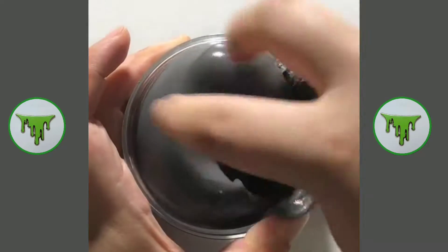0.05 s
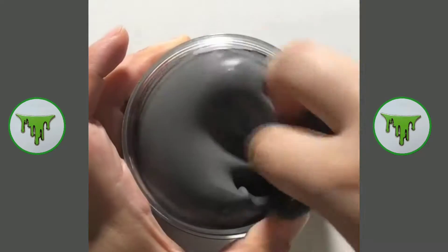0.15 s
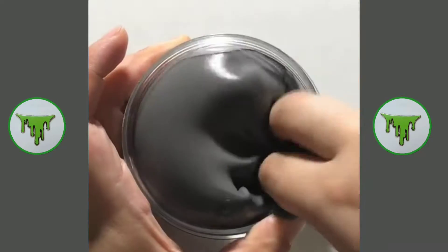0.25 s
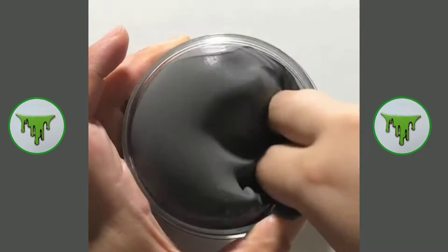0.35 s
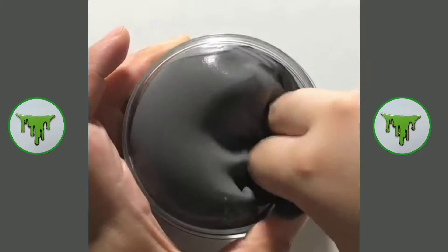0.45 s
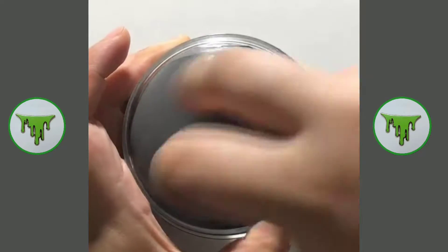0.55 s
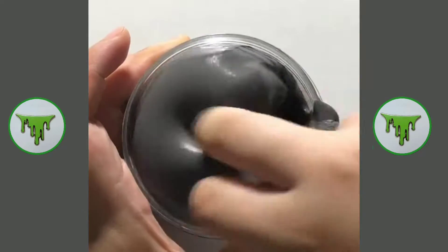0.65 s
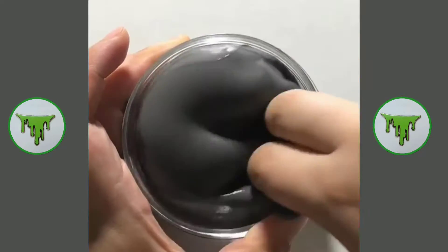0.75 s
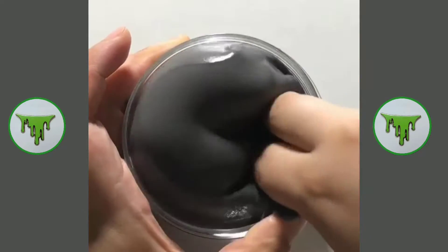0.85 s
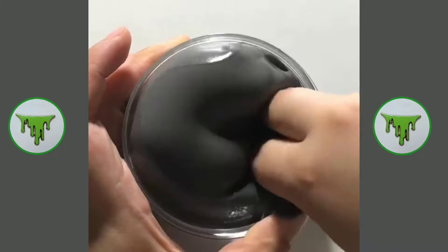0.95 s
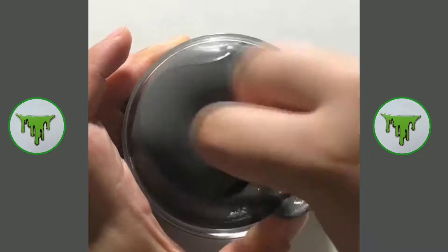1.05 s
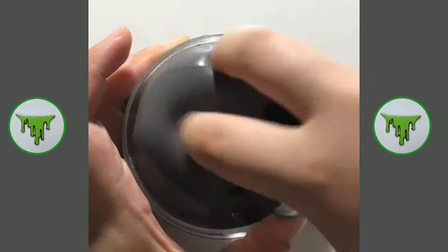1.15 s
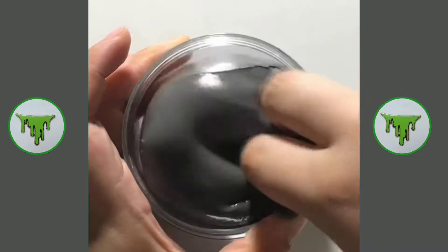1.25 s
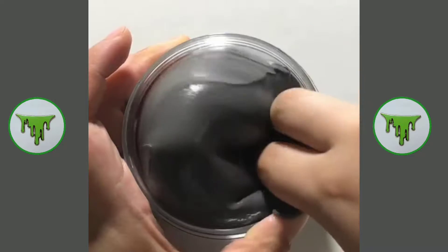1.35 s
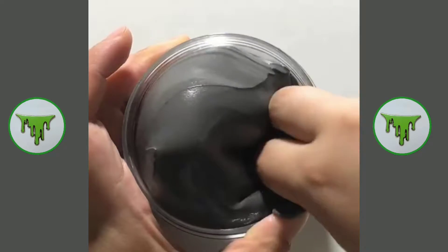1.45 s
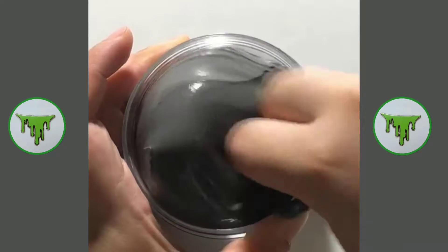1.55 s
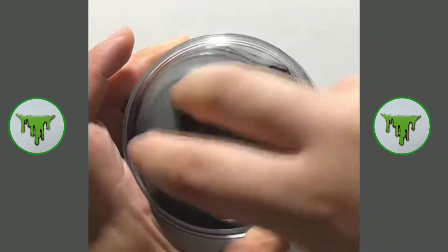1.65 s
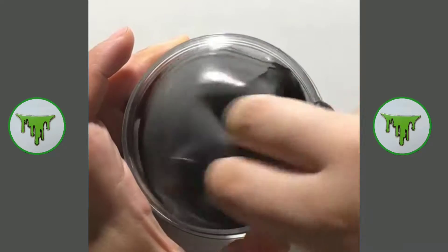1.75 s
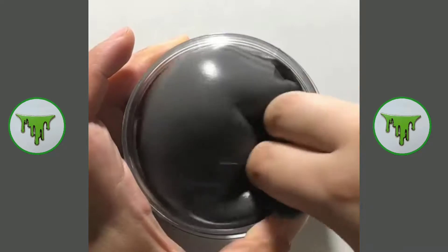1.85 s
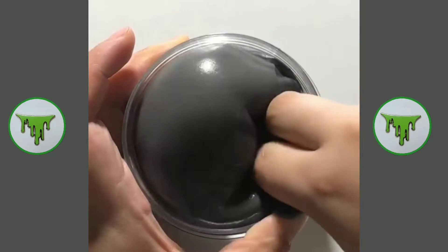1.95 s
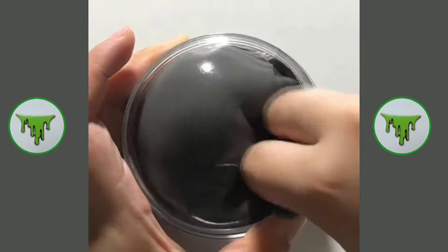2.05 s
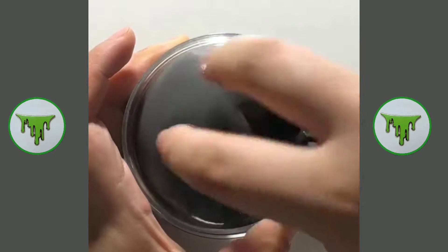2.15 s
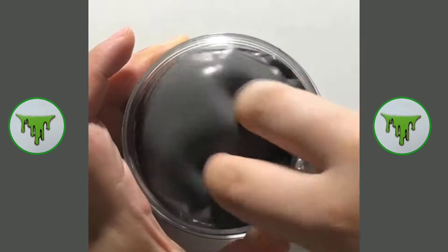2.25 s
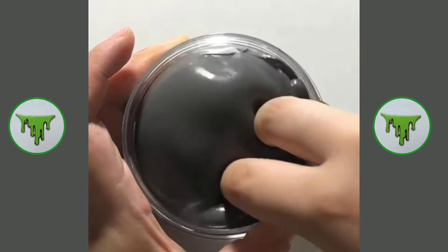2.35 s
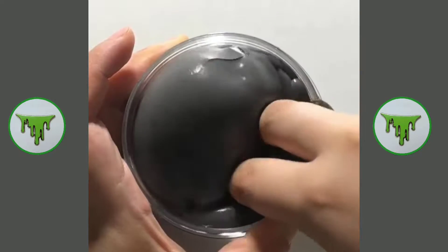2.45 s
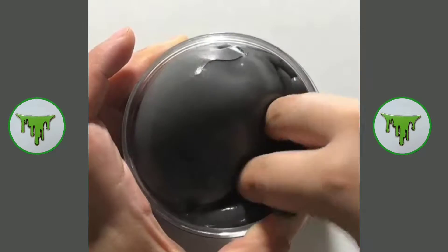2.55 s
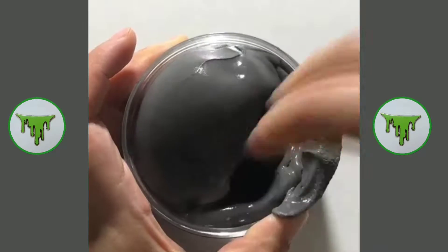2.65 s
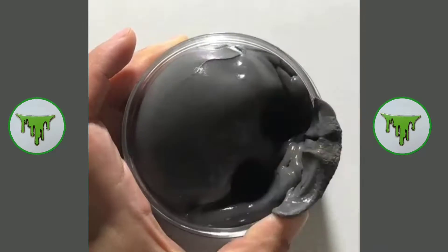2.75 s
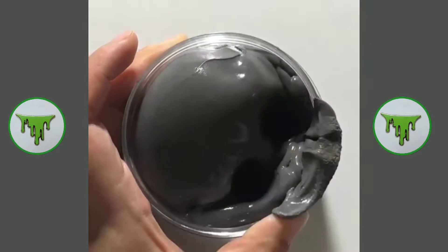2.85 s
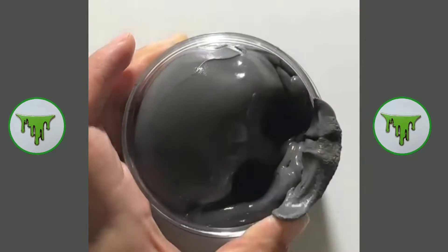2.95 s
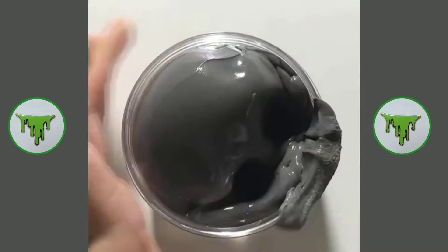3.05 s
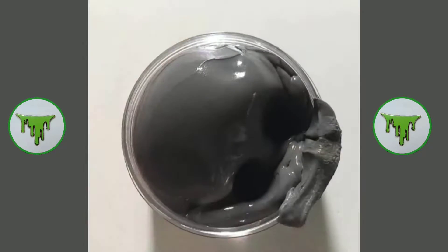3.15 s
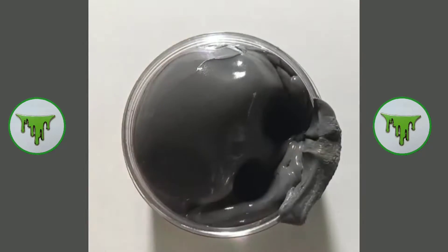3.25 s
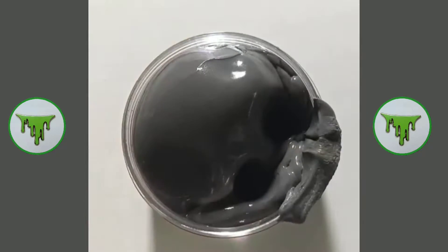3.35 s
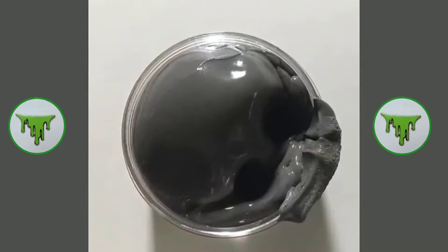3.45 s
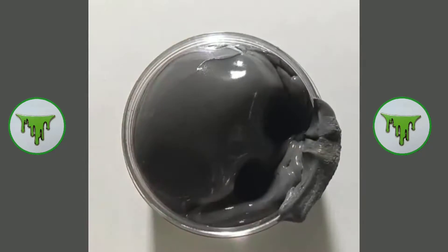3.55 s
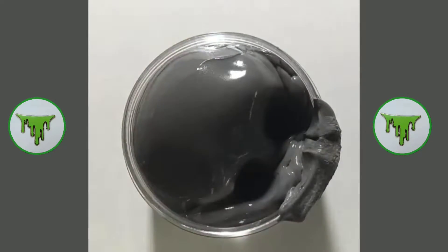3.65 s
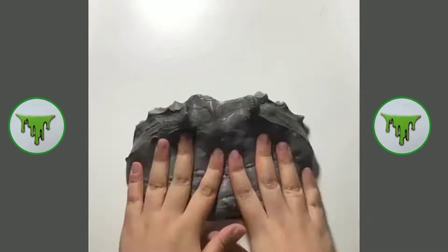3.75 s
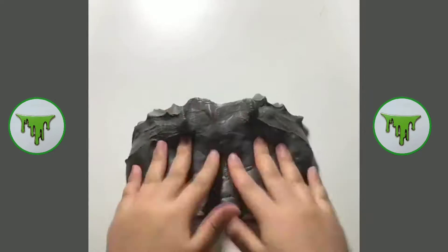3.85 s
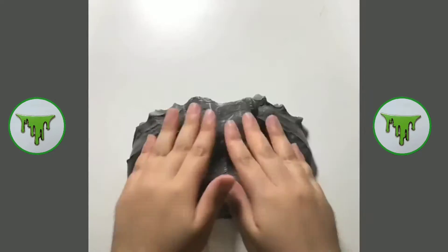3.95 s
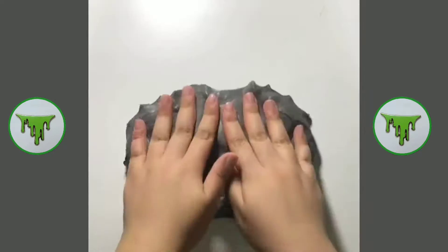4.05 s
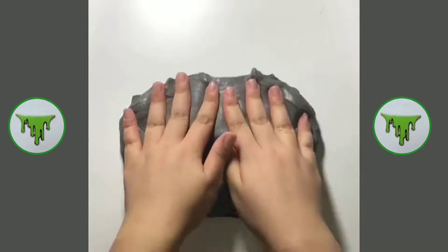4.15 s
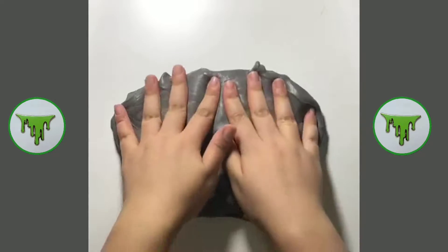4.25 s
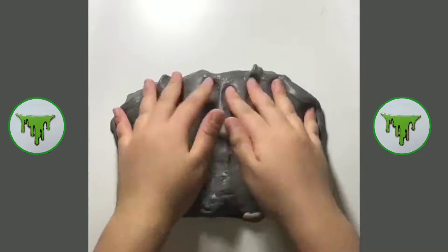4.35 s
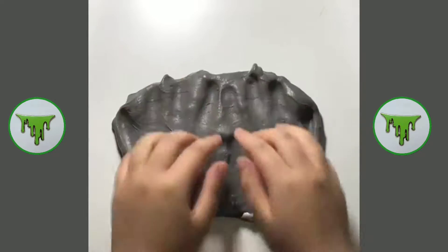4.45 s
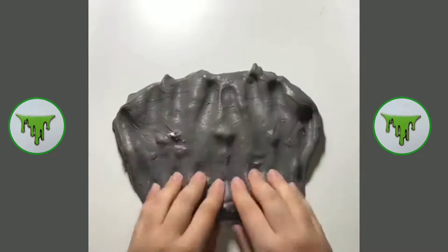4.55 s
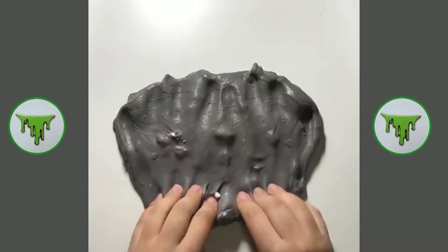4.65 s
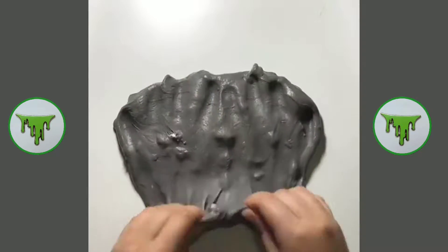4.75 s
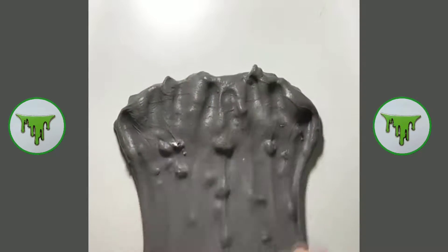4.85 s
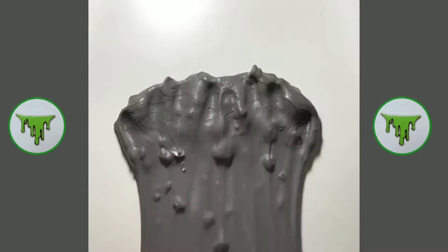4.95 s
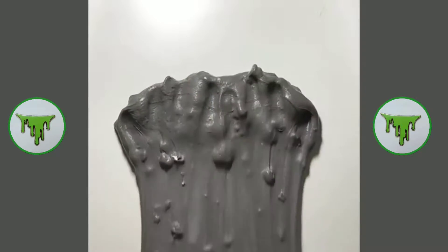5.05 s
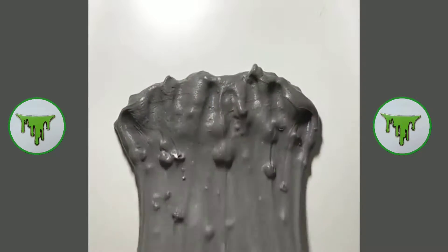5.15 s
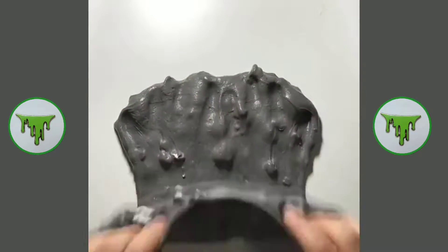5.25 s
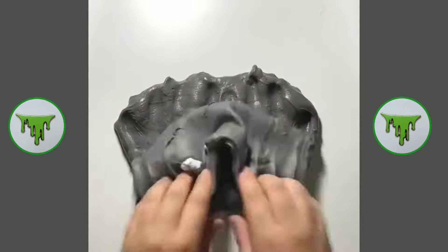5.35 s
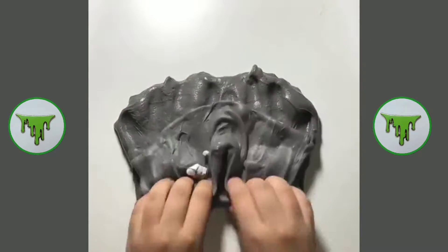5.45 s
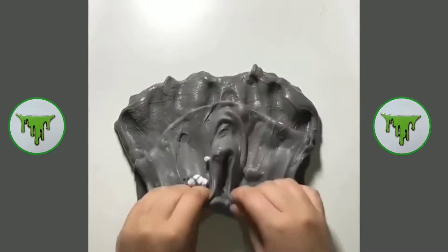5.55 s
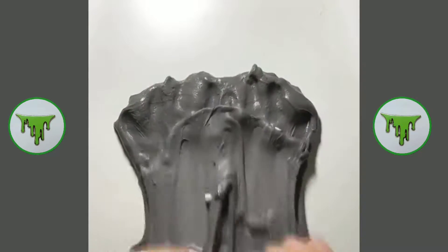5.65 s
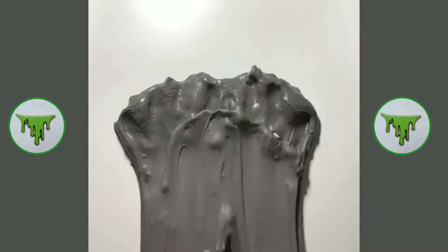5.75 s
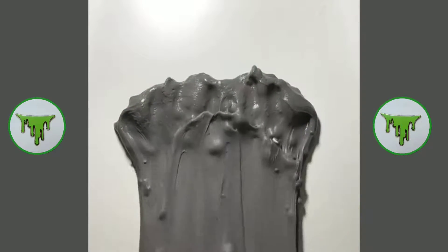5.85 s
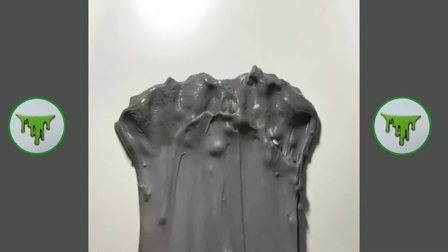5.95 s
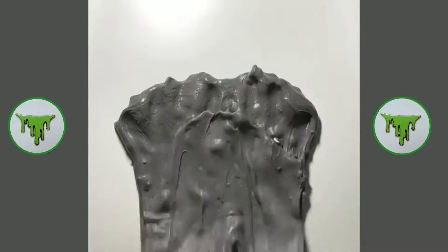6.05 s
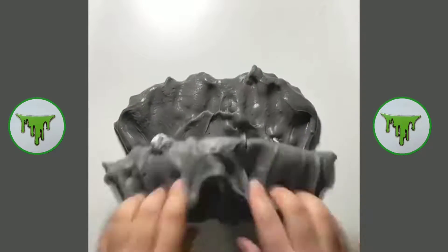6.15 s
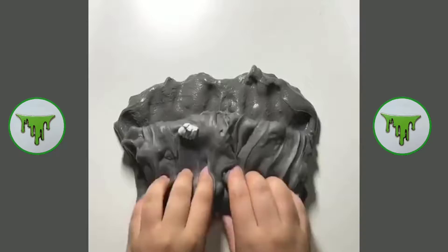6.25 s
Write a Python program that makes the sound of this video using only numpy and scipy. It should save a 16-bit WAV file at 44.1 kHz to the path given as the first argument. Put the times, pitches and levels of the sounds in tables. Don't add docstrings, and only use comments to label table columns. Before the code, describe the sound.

Very close, fingers push into a cup of thick slime: bursts of bright, ringing air pops, sticky crackle and tiny whistles over a soft low wobble. After a quiet gap the slime is spread and pulled on a table, with quieter, lower squelches and wet tearing. Quiet room with faint low hum and a short wall reflection.

```python
import sys
import numpy as np
from scipy import signal
from scipy.fft import rfft, irfft
from scipy.io import wavfile
from scipy.ndimage import uniform_filter1d

SR = 44100
rng = np.random.default_rng(int(sys.argv[2]) if len(sys.argv) > 2 else 0)


def master_out(mix):
    frames = np.transpose(np.atleast_2d(mix))
    ceiling = np.clip(frames, -1, 1)
    pcm = np.round(ceiling * 32767).astype(np.int16)
    wavfile.write(sys.argv[1], SR, pcm)


def invert_db(level):
    return 10 ** (np.asarray(level, dtype=float) / 20)


N = 277830
TABLE_START_S = 3.896


def level(x, db):
    return x * invert_db(db) / np.sqrt(np.mean(x ** 2))


def band(x, lo_hz, hi_hz, order=2):
    edges_hz = [lo_hz, min(hi_hz, .45 * SR)]
    return signal.sosfilt(signal.butter(order, edges_hz, "band", fs=SR, output="sos"), x)


def steep_lowpass(x, edge_hz, stop_db):
    return signal.sosfiltfilt(signal.ellip(6, .3, stop_db, edge_hz, fs=SR, output="sos"), x)


def ring(hz, t60_s, size, rise_s=.0001, glide=0.):
    t = np.arange(size) / SR
    envelope = (1 - np.exp(-t / rise_s)) * np.exp(-np.log(1000) * t / t60_s)
    mode = envelope * np.sin(2 * np.pi * hz * t * (1 + glide * t / t60_s))
    return mode / np.abs(mode).max()


def add(out, start_s, x):
    i = int(start_s * SR)
    out[i:i + len(x)] += x[:len(out) - i]


def walk(rate_hz):
    hold = int(SR / rate_hz)
    held = np.repeat(rng.standard_normal(N // hold + 1), hold)[:N]
    return uniform_filter1d(uniform_filter1d(held, hold), hold) * np.sqrt(2)


def pockets():
    # time in seconds, pocket peak in dB, pocket pitch in Hz,
    # finger hole over pocket in dB, top partial over pocket in dB.
    large = [(0.0967, -22, 2780, -32, -1), (0.4634, -15.5, 4650, 3.5, -9), (0.4705, -33, 4700, -27, -8),
             (0.6256, -32, 5400, 7.5, 12), (0.6497, -12, 4210, -4.5, -5), (0.974, -36, 5500, -42, -2),
             (1.1642, -34, 3900, -8, -1), (1.1678, -32, 3700, -18.5, 1), (1.1722, -17.5, 3820, 1.5, 2.5),
             (1.6911, -27.5, 4200, 0.5, -11), (1.6932, -15, 5500, -34, -10), (1.715, -33, 4220, 1, -1),
             (2.2167, -35, 5000, -27, -3), (2.2219, -17.5, 4500, -31, 0), (2.4497, -26, 4380, -9.5, -6),
             (2.7612, -18.5, 5100, -25, 7), (2.7641, -13, 4840, -12.5, 3), (2.765, -24, 4430, -15, 10.5),
             (2.7795, -31.5, 4000, -6.5, -8), (2.7807, -31, 3860, -2.5, 0), (4.236, -45, 6800, -8, 2),
             (4.892, -33, 3510, 5, -16), (5.5438, -23.5, 3530, 1, -7.5), (5.8205, -36, 3660, 14, -2),
             (0.4581, -32, 4600, -1.5, -13)]
    # time in seconds, peak in dB, pitch in Hz.
    small = [(0.6503, -26.5, 10900), (1.1634, -33, 11000), (1.1725, -29.5, 10800), (1.179, -31, 7700),
             (2.222, -21.5, 10500), (2.2168, -34, 7300), (2.5103, -28, 8300), (0.1075, -36, 8000),
             (0.63, -31, 4500), (0.6612, -37, 10800), (0.1107, -29, 3510), (0.2826, -43, 4310),
             (0.65, -20, 5820), (0.6618, -35, 3430), (0.9017, -49, 4440), (0.93, -41, 4630),
             (0.963, -38, 5850), (0.9804, -30.5, 5400), (1.015, -38.5, 3700), (1.1785, -23.5, 4200),
             (1.494, -40, 4720), (1.522, -47, 3600), (1.6934, -15.5, 7760), (1.71, -27.5, 5200),
             (1.713, -31, 5130), (2.418, -44.5, 4860), (2.5723, -31, 4800), (4.226, -43, 3480),
             (4.26, -49, 4390), (4.3172, -46, 4660), (4.685, -50.5, 3460), (4.8445, -36, 4740),
             (5.092, -40, 2800), (5.208, -36, 3600), (5.7802, -31.5, 2820), (5.91, -38.5, 3470),
             (5.92, -37.5, 3800), (5.964, -43.5, 3970)]
    # time in seconds, peak in dB, pitch in Hz.
    hollows = [(0.099, -15.5, 2460), (0.1184, -35, 1360), (0.122, -29, 2390), (0.641, -27, 2400),
               (5.753, -29, 1100), (5.719, -30, 2200), (4.969, -30, 1300), (5.023, -33.5, 1210),
               (0.629, -20.5, 2350), (0.6314, -25, 1760), (1.964, -36.5, 1720), (2.0345, -38.5, 1750),
               (2.192, -35.5, 1700), (2.3737, -39.5, 1850), (2.4024, -29, 1930), (2.574, -26.5, 2330),
               (3.1938, -35.5, 1570), (4.183, -31, 998), (4.3166, -29.5, 1030), (4.899, -22, 1370),
               (4.9328, -30, 2450), (4.9525, -24, 1200), (4.9555, -27, 1010), (5.1752, -34.5, 2670),
               (5.388, -31.5, 1750), (5.535, -20, 1110), (5.743, -25, 1410), (5.6124, -30, 1310),
               (5.626, -26.5, 1250), (5.675, -28.5, 1150), (5.762, -25, 1350), (5.799, -30, 1160),
               (5.857, -32, 1300), (6.2052, -28, 1250), (6.2075, -26, 880)]
    # time in seconds, peak in dB.
    films = [(0.428, -47), (0.4363, -48.5), (0.6211, -45), (1.071, -59), (2.418, -49), (2.5038, -35.5),
             (2.5068, -45.5), (2.513, -35), (2.5134, -44), (2.518, -29), (2.5213, -37), (2.6416, -44),
             (2.754, -33), (3.1943, -55), (4.4957, -38)]
    # time in seconds, peak in dB.
    cracks = [(0.09, -49), (1.4312, -54), (1.45, -58), (1.9637, -45.5), (2.035, -54), (2.1925, -50),
              (2.29, -63), (2.545, -54), (5.8188, -35.5), (2.755, -40), (2.783, -36), (4.2372, -44),
              (4.4225, -50.5), (4.685, -48), (5.0928, -44.5), (5.1756, -49), (5.208, -51), (5.39, -56),
              (6.2049, -43.5)]

    def hole_hz(s):
        return 1750 if s < TABLE_START_S else 1250

    bursts = []
    for s, db, hz, hole_db, top_db in large:
        bursts.append((s, db, hz, db + hole_db, hole_hz(s), db + top_db))
    for s, db, hz in small:
        bursts.append((s, db, hz, db - 13.5, hole_hz(s), db - 35))
    for s, db, hz in hollows:
        bursts.append((s, db - 18.5, hz * 2.3, db, hz, db - 30))
    for s, db in films:
        bursts.append((s, db - 17, 5200, db - 34, hole_hz(s), db))
    for s, db in cracks:
        bursts.append((s, db, 4500, db + 3.5, 2240, db + 3))
    return bursts


def pops():
    out, t = np.zeros(N), np.arange(400) / SR
    for s, db, hz, hole_db, hole_hz, top_db in pockets():
        pocket = invert_db(db - .7) * ring(hz, .0036, size=400, glide=-.05)
        top_hz = np.clip(hz * 1.95, 7500, 10800) * (1 + .04 * rng.standard_normal())
        top = invert_db(top_db - .7) * ring(top_hz, .0022, size=400)
        hole = ring(hole_hz, 11.0 / hole_hz, size=400, rise_s=.4 / hole_hz, glide=-.08)
        hole = invert_db(hole_db - 8.5) * hole
        spray = np.diff(rng.standard_normal(401)) * .7 * np.exp(-t / .0029)
        spray = spray * (invert_db(db - 18.5) + invert_db(top_db - 18.0))
        add(out, s, pocket + top + hole + spray)
    return out


def snaps():
    # time in seconds, peak in dB, pitch in Hz.
    strands = [(0.1195, -33, 3500), (0.277, -52, 4500), (0.309, -49, 1800), (0.31, -48, 4500),
               (0.428, -42, 8500), (0.4362, -35, 7800), (0.4633, -18.5, 1520), (0.4637, -19.5, 2650),
               (2.7613, -24, 5500), (0.893, -50, 2500), (0.902, -46, 7500), (0.909, -46, 5000),
               (0.9628, -29.5, 8500), (0.974, -33, 4500), (0.9804, -27.5, 5000), (0.995, -46, 4600),
               (1.002, -43, 4400), (1.431, -49, 4200), (1.45, -49, 5200), (1.494, -50, 9000),
               (1.507, -46, 6200), (1.522, -48, 5000), (2.4497, -40, 1490), (2.5717, -34, 3500),
               (2.7641, -6, 5400), (2.7644, -25, 1110), (4.182, -43, 2500), (4.1915, -43.5, 9000),
               (4.227, -42, 3000), (4.2371, -33.5, 8000), (4.2593, -44, 7000), (4.3162, -39, 3470),
               (5.61, -43, 3500), (5.845, -40, 3500), (5.857, -42, 2800), (5.896, -46, 4100),
               (5.97, -46, 4800), (6.012, -49, 3500), (6.025, -50, 4000), (6.204, -37.5, 3000),
               (6.2057, -40, 6200), (6.207, -36, 3200), (6.212, -43, 2500), (6.233, -43.5, 2800)]
    out = np.zeros(N)
    for s, db, hz in strands:
        add(out, s, invert_db(db) * ring(hz, 5 / hz, size=200, rise_s=.3 / hz))
    return out


def ticks():
    # time in seconds, peak in dB, pitch in Hz.
    threads = [(0.2713, -45, 4550), (0.305, -48, 3700), (0.35, -43, 4220), (1.1, -45, 5270),
               (1.485, -47, 4930), (1.5056, -49, 4800), (2.4, -51, 4450), (2, -49, 2680),
               (3.1637, -45.5, 4500), (5.328, -38, 3350), (5.7114, -34, 4100), (5.98, -42, 3950),
               (5.9555, -47, 9000), (5.955, -46, 4200), (6.5, -43, 3900), (6.104, -47, 6400),
               (6.103, -48, 8700), (2.408, -51, 4600), (2.424, -48, 4600), (2.409, -48, 8500),
               (2.464, -49, 4600), (2.489, -54, 10500), (5.014, -38, 3900), (4.939, -38, 3200),
               (5.808, -42, 6800), (5.1, -42, 5800), (5.4, -42, 3200)]
    out, t = np.zeros(N), np.arange(400) / SR
    for s, db, hz in threads:
        spray = .3 * rng.standard_normal(400) * np.exp(-t / .002)
        add(out, s, invert_db(db - 6) * (ring(hz, .009, size=400) + spray))
    return out


def whistles():
    # time in seconds, length in seconds, start pitch in Hz, end pitch in Hz, level in dB.
    slits = [(0.4635, 0.0052, 11300, 8500, -25), (0.4685, 0.0045, 4700, 4600, -36),
             (0.324, .026, 1800, 2050, -57.5), (0.38, 0.008, 7400, 8600, -46),
             (2.508, 0.016, 10600, 10300, -36), (0.0992, .006, 3700, 4600, -33),
             (0.1065, .0035, 4900, 5360, -34), (2.766, .0025, 4300, 5300, -33),
             (2.7, 0.024, 5700, 5000, -53), (2.388, 0.015, 1800, 1900, -53), (2.39, .018, 3100, 3500, -60),
             (2.578, .014, 3300, 3100, -57), (1.1805, .005, 10300, 11500, -39),
             (6.3, .014, 1300, 1450, -43)]
    out = np.zeros(N)
    for s, length_s, start_hz, end_hz, db in slits:
        n = int(length_s * SR)
        hz = end_hz + (start_hz - end_hz) * np.linspace(1, 0, n) ** 2
        if length_s > .01:
            hz = hz + 900 * (start_hz / 10000) ** 2 * rng.standard_normal(n)
        add(out, s, invert_db(db) * np.hanning(n) ** .5 * np.sin(2 * np.pi * np.cumsum(hz) / SR))
    return out


def jolts():
    # time in seconds, peak in dB, main pitch in Hz.
    shoves = [(0.097, -40, 168), (0.122, -44, 139), (0.464, -33.5, 168.4), (0.632, -41, 166.5),
              (0.653, -39.5, 168), (1.174, -33.5, 191), (1.192, -36.5, 171), (1.694, -36.5, 170.4),
              (2.223, -39, 171), (2.45, -42.5, 304), (2.576, -47, 175), (2.766, -35, 347),
              (2.785, -37, 137), (3.195, -42, 187), (3.999, -42.5, 167.5), (4.031, -46, 170),
              (4.317, -45, 190.5), (4.528, -47.5, 225), (4.551, -48.5, 198), (4.753, -42.5, 185),
              (4.783, -52, 128), (4.823, -50, 177), (4.952, -44.5, 190), (5.388, -44, 198),
              (5.548, -37.5, 139), (5.564, -35, 135.5), (5.69, -48, 197), (5.751, -45, 253),
              (5.8, -48, 130), (6.207, -44.5, 276)]
    # pitch ratio, decay time t60 in seconds, level in dB.
    modes = [(1.001, 0.11, 3.5), (1.501, 0.097, -1.5), (2.199, 0.098, -3), (3.4, 0.064, -5.5)]
    out = np.zeros(N)
    for s, db, hz in shoves:
        wobble = 0
        for ratio, t60_s, mode_db in modes:
            if hz > 260:
                mode_db = mode_db - 9 * np.log2(ratio)
            mode_hz = hz * ratio * (1 + .077 * rng.standard_normal())
            mode = ring(mode_hz, t60_s * min(190 / hz, 1), size=5000, rise_s=.0023)
            wobble = wobble + invert_db(mode_db) * mode
        add(out, s, invert_db(db - 4.0) * wobble)
    return out


def sudden_stop():
    out, t = np.zeros(N), np.arange(int(.0118 * SR)) / SR
    add(out, 5.5892, invert_db(-30) * np.minimum(t / .0087, 1) * np.sin(2 * np.pi * 205 * t))
    return out


def tearing(centre_hz, spread_oct, cycles, rate_hz, scatter_db, hiss_db):
    grains, hiss = 0, 0
    for step in np.linspace(-1.6, 1.6, num=9):
        hz = min(centre_hz * 2 ** (spread_oct * step), 11500)
        size = np.minimum(rng.exponential(size=N), 3.0)
        hits = (rng.random(N) < rate_hz / 9 / SR) * invert_db(scatter_db * size)
        patch = np.exp(-step ** 2 / 4) * invert_db(4.2 * walk(30))
        grains = grains + patch * np.convolve(hits, ring(hz, 3 * cycles / hz, size=900))[:N]
        lo_hz, hi_hz = hz * 2 ** (-.3 * spread_oct), hz * 2 ** (.26 * spread_oct)
        hiss = hiss + patch * band(rng.standard_normal(N), lo_hz, hi_hz, order=1)
    return level(level(grains, 0) + level(hiss, hiss_db), 0)


def strain(family):
    # time in seconds, middle grains in dB, coarse over middle in dB,
    # fine over middle in dB.
    rips = [(0.0, -64, 5.5, -4.5), (0.1, -45, -1.5, -7.5), (0.306, -61.5, 0, 1.5), (0.402, -56, -8, 1),
            (0.431, -59, -1, 3), (0.465, -56, 11, 7.5), (0.629, -43, -2, -20), (0.652, -43, -4.5, -7),
            (1.007, -59, -19, -8), (1.174, -44.5, -3, -10), (1.699, -47, -1, -5.5), (1.919, -62.5, 0.5, 6),
            (2.217, -49, -7, -1), (2.385, -73, 12.5, -12), (2.505, -60, -1, 19), (2.574, -59.5, 0, 0.5),
            (2.762, -47, -4, 4), (2.78, -49.5, -5, 0), (5.692, -56, -2, -3), (5.808, -58.5, -5, 2.5),
            (4.943, -55, 6, -1), (5.015, -54, -5, -12), (0.66, -54, -4, -5), (3.188, -58, 2, -6.5),
            (3.298, -70, -1, 9), (4.189, -65, 11, 5), (4.318, -61.5, 10.5, -4), (4.774, -62, 0.5, 8),
            (5.2, -60, -2, 3.5), (5.386, -58.5, 5.5, -11), (5.544, -47.5, 11.5, -3.5),
            (6.096, -65.5, -11, -1), (5.96, -57.5, -10, -23), (6.003, -56, -8, -21), (6.207, -62.5, 11, -6)]
    # start in seconds, length in seconds, level in dB,
    # change over the length in dB, coarse over fine in dB.
    drags = [(0.279, 0.088, -72.5, 7.5, -3), (0.054, 0.031, -77, 12, 0), (0.872, 0.14, -72, 7, -5),
             (1.127, 0.037, -74.5, 11, -6.5), (1.381, 0.16, -68.5, 0.5, -4), (1.65, 0.028, -74.5, 9.5, -6),
             (2.022, 0.099, -66.5, -9.5, -0.5), (2.2, 0.015, -68, 10, 0), (0.49, 0.098, -68.5, -10, -6),
             (5.503, 0.032, -70, 4, 3), (2.41, 0.16, -66, -12, 1), (2.595, 0.053, -76.5, 5.5, -6),
             (3.987, 0.053, -54, 0, -3.5), (4.199, 0.075, -70, 5.5, 3), (4.374, 0.047, -71, -0.5, 8),
             (4.513, 0.052, -53.5, -5.5, -3.5), (4.698, 0.17, -63.5, -1, 0), (4.9, 0.13, -53, -3, 6.5),
             (5.087, 0.19, -62.5, -9, -1), (5.319, 0.37, -66.5, -13, 5), (5.631, 0.079, -67, 13, 3),
             (5.716, 0.17, -53.5, -9, 11.5), (5.89, 0.17, -64, -5, 4.5), (6.107, 0.17, -66.5, -5, -0.5)]
    # coarse, middle, fine in dB.
    rest_db = (-82, -81, -85)
    rip_rise_db_s, rip_fall_db_s = 1599, (250, 290.5, 270)[family]
    rip_hold_s = .11
    drag_rise_db_s, drag_fall_db_s = 445, 455
    t = np.arange(0, N + 64, 64) / SR
    power = np.full(len(t), invert_db(2 * rest_db[family]))
    for s, db, coarse_db, fine_db in rips:
        rise = rip_rise_db_s * (s - t)
        fall = rip_fall_db_s * (t - s) * (1 + (t - s) / rip_hold_s)
        colour_db = (coarse_db, 0, fine_db)[family]
        power = power + invert_db(2 * (db + colour_db - np.where(t < s, rise, fall)))
    for s, length_s, db, change_db, tilt_db in drags:
        fade = drag_rise_db_s * np.maximum(s - t, 0)
        fade = fade + drag_fall_db_s * np.maximum(t - s - length_s, 0)
        colour_db = (tilt_db / 2, 0, -1 - tilt_db / 2)[family]
        sag = change_db * np.clip((t - s) / length_s, 0, 1)
        power = power + invert_db(2 * (db + colour_db + sag - fade))
    return np.interp(np.arange(N) / SR, t, np.sqrt(power))


def jerks():
    slips = (rng.random(N) < 160 / SR) * np.minimum(rng.exponential(size=N), 2.5)
    decay = np.exp(-np.arange(600) / SR / .0025)
    return level(1 + .3 * np.convolve(slips, decay)[:N], 0)


def skin():
    # centre pitch in Hz, pitch spread in octaves, ring in cycles, grains per second,
    # size scatter in dB, wet hiss in dB.
    families = [(1332, 0.67, 4.9, 700, 2.5, 1.5), (4048, 0.46, 22, 920, 2.2, 2),
                (8920, 0.28, 7.2, 3600, 5.5, 3.5)]
    torn = 0
    for k, family in enumerate(families):
        torn = torn + strain(k) * invert_db(.5) * tearing(*family)
    return torn * jerks() * invert_db(1.2 * walk(40))


def walls(x):
    t = np.arange(12000) / SR
    delay_s, smear_s, tail_t60_s = .0165, .0036, .2
    wall = np.exp(-.5 * ((t - delay_s) / smear_s) ** 2) * rng.standard_normal(len(t))
    envelope = np.minimum(t / .002, 1) * np.exp(-np.log(1000) * t / tail_t60_s)
    tail = envelope * band(rng.standard_normal(len(t)), 420, 8500, order=1)
    answer = invert_db(-29) * wall / np.linalg.norm(wall) + invert_db(-25.5) * tail / np.linalg.norm(tail)
    return signal.fftconvolve(x, answer)[:N]


def room():
    # frequency in Hz, noise density in dB per Hz.
    spectrum = [(18, -39.5), (30, -35), (58, -1.5), (130, 0.5), (200, -7), (400, -14.5), (800, -23.5),
                (1600, -31.5), (3200, -39), (11000, -44), (14000, -53.5)]
    hz, db = np.transpose(spectrum)
    bins_hz = np.maximum(np.fft.rfftfreq(N, 1 / SR), 1)
    gain = invert_db(np.interp(np.log(bins_hz), np.log(hz), db))
    hum = irfft(rfft(rng.standard_normal(N)) * gain, N)
    return level(hum * invert_db(.4 * walk(3)), -55.5)


def glitches():
    # time in seconds, peak in dB.
    clicks = [(0.644, -52), (2.219, -47), (4.2369, -60)]
    out = np.zeros(N)
    for s, db in clicks:
        add(out, s, invert_db(db) * np.array([1., -1.]))
    return out


def treble_patches(x):
    side, smear = 0, rng.standard_normal(256)
    for lo_hz in (4300, 5600, 7300, 9500):
        patch = np.repeat(rng.random(N // 2048 + 1) < .45, 2048)[:N]
        side = side + uniform_filter1d(1. * patch, 400) * band(x, lo_hz, 1.3 * lo_hz, order=4)
    side = invert_db(-12) * np.convolve(side, smear / np.linalg.norm(smear), "same")
    return np.tanh(side / .025) * .025


def scene():
    bright = pops() + snaps() + ticks() + whistles()
    mono = bright + walls(bright) + jolts() + skin() + room()
    return np.array([mono, mono])


def low_pass(x):
    return signal.sosfilt(signal.butter(12, 16000, fs=SR, output="sos"), x)


def record(dry):
    since_s = np.arange(N) / SR - TABLE_START_S
    x = dry[0] * np.where(since_s < 0, 1, np.clip(since_s / .03, .15, 1))
    top_hz = 11800
    body = steep_lowpass(x, top_hz, stop_db=30)
    top = steep_lowpass(x, 1.045 * top_hz, stop_db=20) - body
    top_rms = np.sqrt(uniform_filter1d(top ** 2, 512) + 1e-18)
    gate = np.clip(top_rms / invert_db(-66) - 1, 0, 1)
    x = body + top * gate + sudden_stop() + glitches()
    side = treble_patches(x)
    return low_pass(np.array([x + side, x - side]))


dry = scene()
out = record(dry)
master_out(out)
```